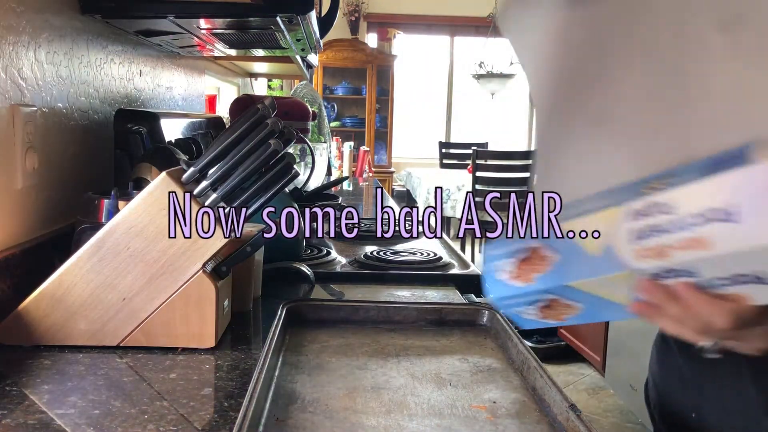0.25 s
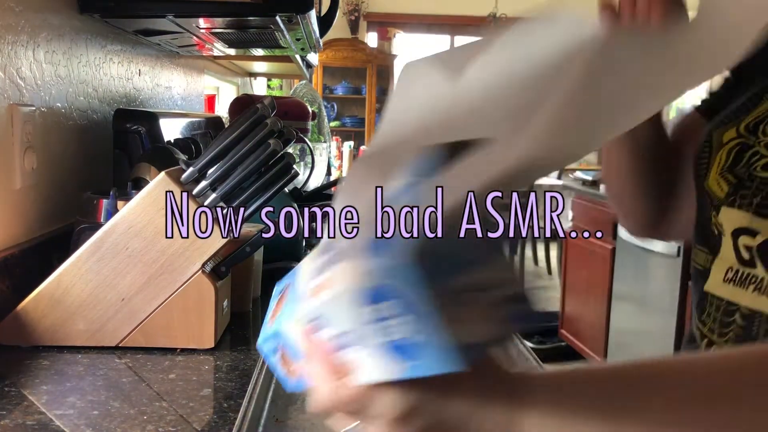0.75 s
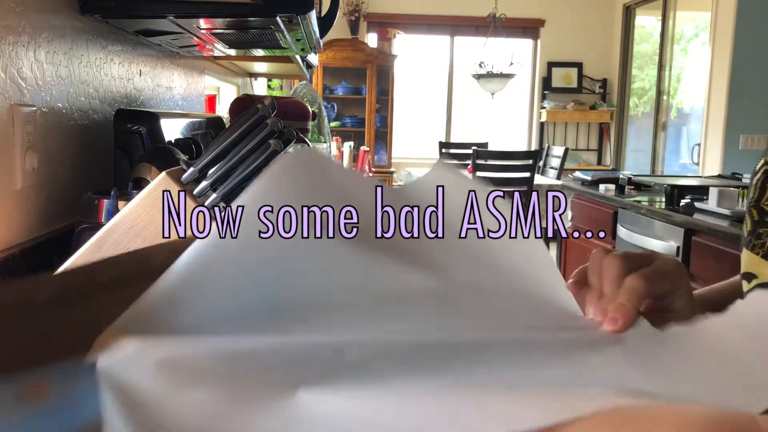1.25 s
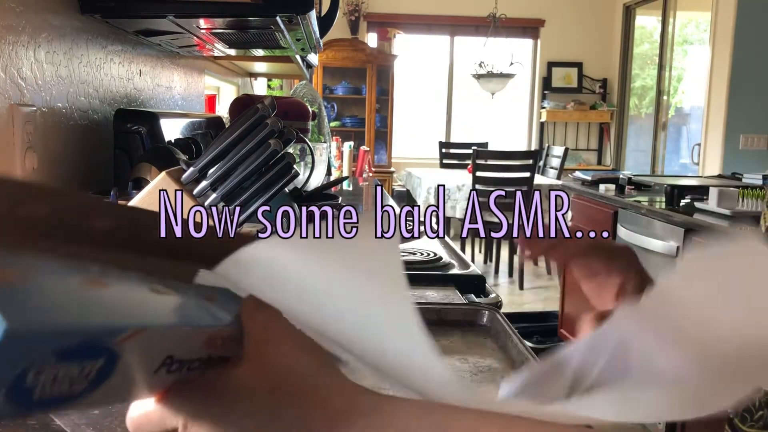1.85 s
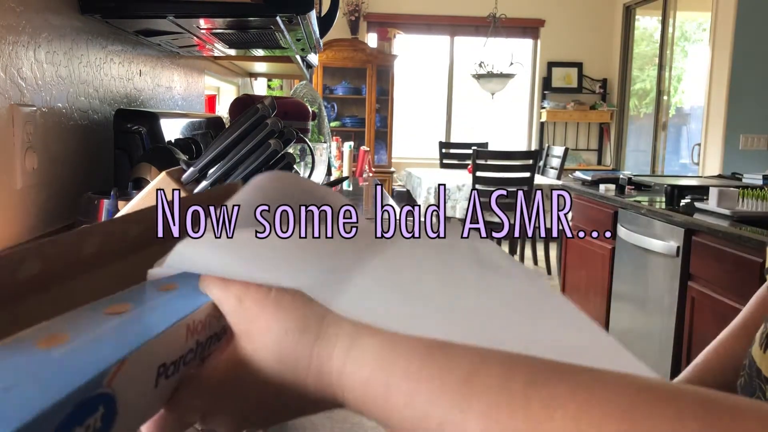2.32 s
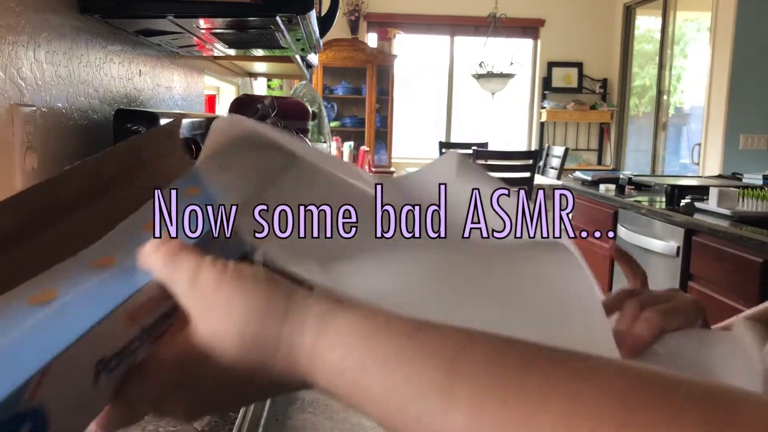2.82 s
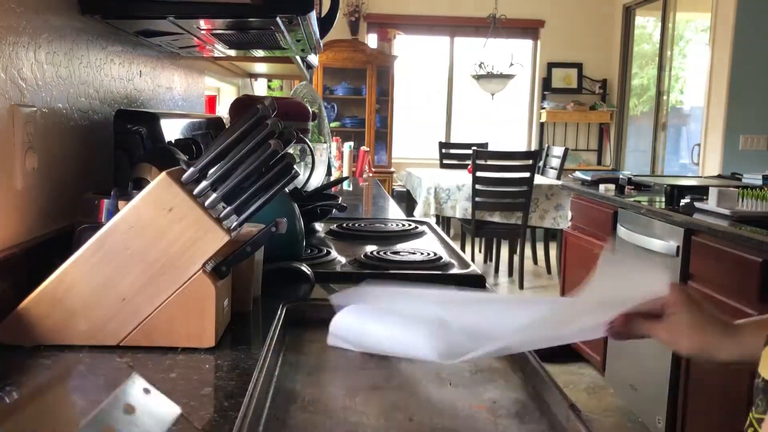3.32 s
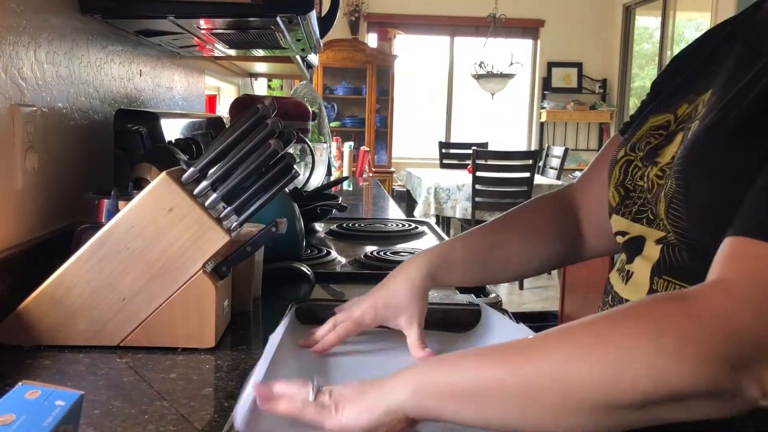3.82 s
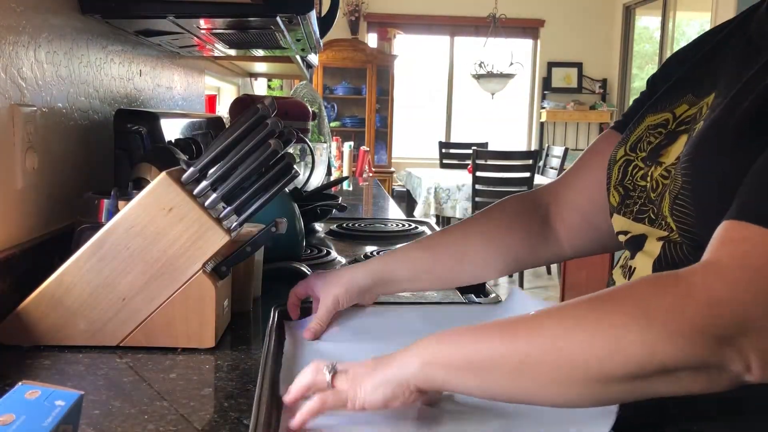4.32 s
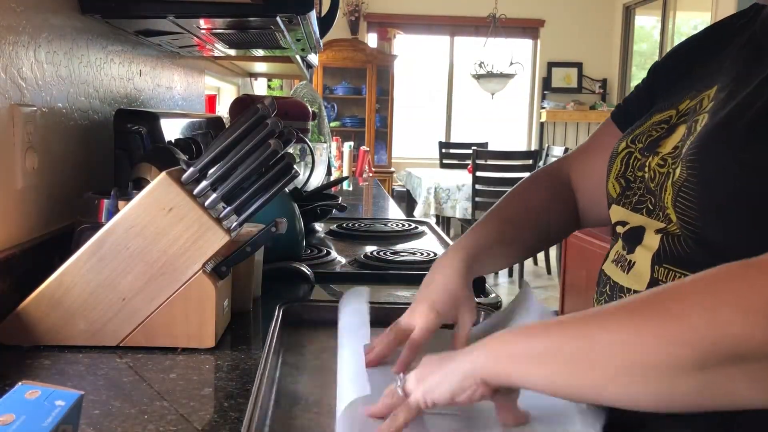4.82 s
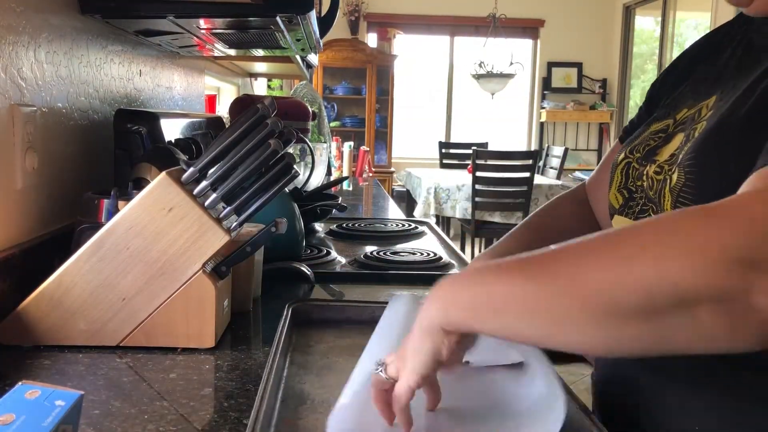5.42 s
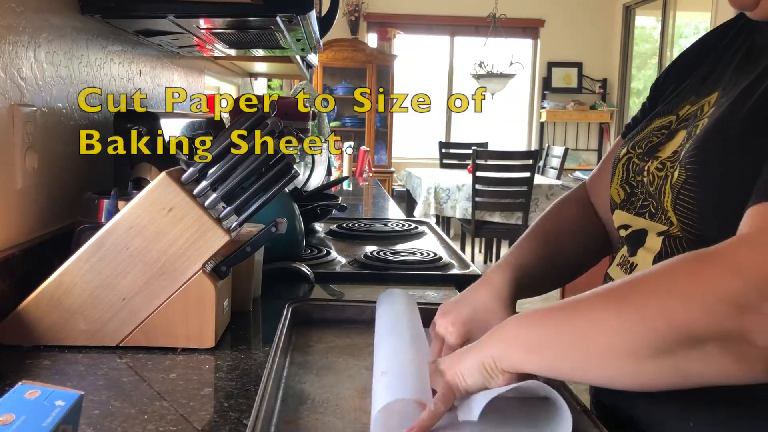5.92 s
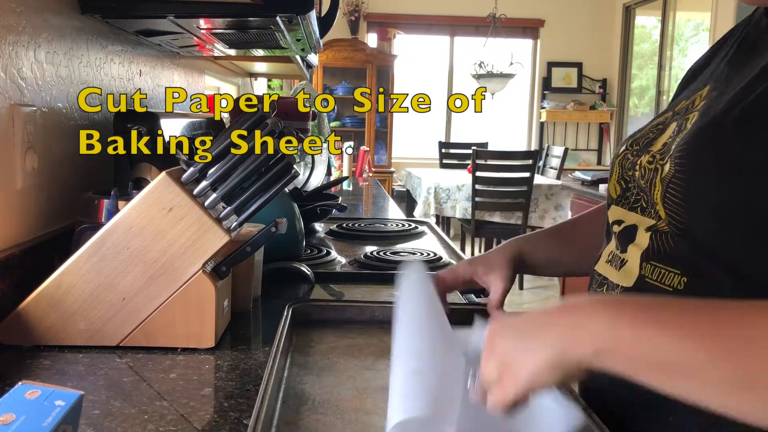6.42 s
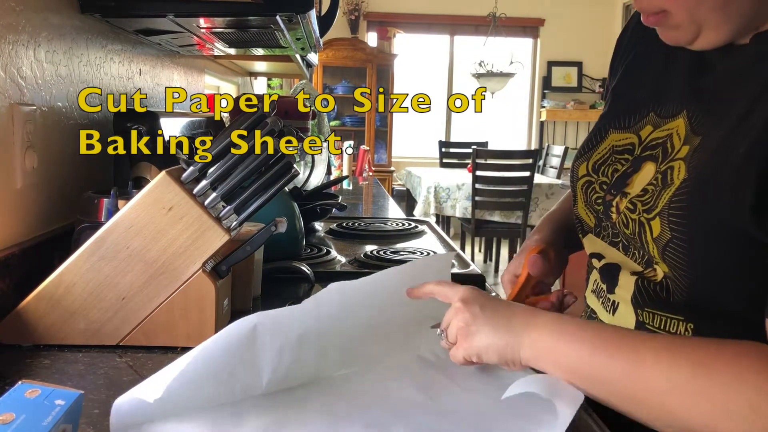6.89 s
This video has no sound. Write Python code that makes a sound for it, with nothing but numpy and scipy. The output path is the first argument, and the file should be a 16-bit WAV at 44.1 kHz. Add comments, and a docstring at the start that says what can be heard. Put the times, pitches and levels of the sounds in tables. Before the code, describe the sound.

A stiff sheet of baking paper is shaken close to the microphone, crackling and snapping loudly, with two short rasping tugs from its carton. A longer tear follows along the cutter, ending in sharp jerks. The box is set down with a clatter of knocks, then hands smooth the much quieter sheet over a metal tray with swishes and tiny pops, in a hard-walled kitchen.

```python
"""Parchment paper rasps from its box, is waved about and torn off along the cutter: stick-slip grains, coloured
by broad spectra and by the resonances of sheet and carton, with creases snapping through. The scene then
changes: knocks of the box are dispersed pulses, and hands smooth the sheet over a metal tray, as a swish of
grains, popping wrinkles and a low noise rub. All is close by, in a kitchen with hard walls, still air (shaped
noise) and a faint appliance hum (wavering sines)."""
import sys
import numpy as np
from scipy import signal
from scipy.fft import rfft, irfft
from scipy.io import wavfile
from scipy.ndimage import uniform_filter1d

SR = 44100
rng = np.random.default_rng(int(sys.argv[2]) if len(sys.argv) > 2 else 0)


def materialize(psi):
    """Save the field psi as 16-bit PCM at rate SR to the path in sys.argv[1].

    A 1-D psi becomes a single channel; in a 2-D psi each row is a channel.
    """
    bounded = np.clip(np.atleast_2d(psi).T, -1, 1)
    quanta = np.round(bounded * 32767).astype(np.int16)
    wavfile.write(sys.argv[1], SR, quanta)


N = 315590

# Spectra set relative density only. Each row: frequency in Hz, density in dB per Hz.
AIR_SPECTRUM = [(25, -60), (60, -33), (110, -10.5), (200, -16), (300, 1.5), (440, 9.5), (620, -1),
                (1050, -0.5), (1400, 6.5), (2200, -1), (3000, -4), (4000, -53), (8000, -11), (16000, -3)]  # still kitchen air
KNOCK_SPECTRUM = [(30, -63), (60, -49), (130, -19), (220, 2), (600, -4), (1700, -1.5), (2200, -7),
                  (2600, 6), (2950, -25), (4000, -1), (8000, 3), (16000, -34)]  # blows on counter and tray
SWISH_SPECTRUM = [(100, -63), (400, -2), (1000, -11), (1400, -4), (2000, 2), (2500, 3.5), (2900, -6.5),
                  (3500, 3), (5600, 4), (8800, 2), (12000, 6), (16000, 3.5)]  # palms over the paper
RUB_SPECTRUM = [(30, -64), (60, -43), (110, -24), (190, -2), (450, 2.5), (650, 0), (850, 1), (1100, -14),
                (2500, -55)]  # pressure of the hands on the tray
SNAP_SPECTRUM = [(50, -18.5), (250, -17), (600, -8.5), (850, -12.5), (1600, -1.5), (3500, 1), (8000, 2),
                 (16000, -3.5)]  # creases snapping through
SHEET_SPECTRUM = [(100, -35), (250, -17), (400, -12.5), (680, -3.5), (850, -12), (1100, -2.5), (1500, 0),
                  (2200, -4), (3500, -2.5), (6000, -6.5), (9000, -11), (12000, -15.5), (16000, -18)]  # rustle of the loose sheet
PUFF_SPECTRUM = [(20, -30), (40, -25), (65, 0), (120, 2), (250, -1.5), (450, 5), (1000, -68), (3000, -60)]  # air fanned by the sheet
RIP_SPECTRUM = [(30, -40), (60, -15.5), (250, -12), (450, -1.5), (720, -16.5), (840, -11), (1000, -4.5),
                (1300, 1), (1600, 2), (2200, -2), (3500, 0.5), (6000, 1), (9000, -1), (11000, -4),
                (16000, -10)]  # breaking fibres

# Appliance tones. Each row: frequency in Hz, level before the fade in dB, rms waver in Hz.
HUM_TONES = [(207, -74.5, 2.5), (1320, -71, 4.97)]
# Fade of the hum. Each row: time in seconds, gain in dB.
HUM_FADE = [(0, -9.5), (6.3, -0.5), (6.8, -12)]
# Decay of the room. Each row: frequency in Hz, t60 in seconds.
ROOM_DECAY = [(200, 0.24), (700, 0.19), (2000, 0.1), (6000, 0.2), (15000, 0.15)]
# Box set down, then fingertips on the tray. Each row: time in seconds, level in dB, knock pitch in Hz.
KNOCKS = [(3.3706, -30.5, 1960), (3.4066, -40, 1720), (3.4519, -46, 600), (3.4607, -38.5, 1147),
          (3.5073, -39.5, 2300), (3.518, -43, 780), (3.527, -40.5, 2600), (3.648, -56, 900),
          (4.669, -55, 400), (4.768, -53, 448), (4.901, -54.5, 350), (4.966, -55, 447), (5.098, -54.5, 330),
          (5.292, -53.5, 516), (6.11, -67, 300), (6.34, -57, 200)]
# Largest wrinkles popping under the fingers. Each row: time in seconds, level in dB, crack length in seconds.
LARGE_POPS = [(3.3115, -37.5, 0.0039), (3.3527, -29.5, 0.0041), (3.5068, -34.5, 0.0018),
              (3.646, -33.5, 0.0036), (4.5488, -46, 0.0031), (4.5587, -42, 0.0028), (4.8744, -39, 0.0067),
              (5.0936, -43, 0.0044), (5.41, -39, 0.0085), (5.574, -37, 0.0012), (5.632, -36.5, 0.0056),
              (5.6948, -37, 0.0007), (5.829, -40, 0.0036), (5.981, -51, 0.0005), (6.0, -38.5, 0.0035),
              (6.05, -34, 0.004), (6.1345, -40, 0.003), (6.179, -33.5, 0.0018), (6.661, -33.5, 0.0078),
              (6.705, -36, 0.0059), (6.763, -39.5, 0.0031), (7.111, -44, 0.00072)]
# Hands sweeping the sheet over the tray. Each row: start in seconds, length in seconds, level in dB,
# treble over body in dB, level of the low rub in dB.
SWEEPS = [(3.273, 0.32, -52.5, 8, -62.5), (3.625, 0.05, -44.5, 3.5, -58.5), (3.69, 0.1, -62, 10, -71),
          (3.804, 0.14, -58.5, 7, -63.5), (3.984, 0.1, -63, 9.5, -76), (4.09, 0.47, -59.5, 9, -70.5),
          (4.367, 0.059, -54.5, 4, -73), (4.494, 0.17, -60, 4, -70), (4.65, 0.12, -61.5, 6.5, -72),
          (4.776, 0.13, -53.5, 5, -62), (4.922, 0.084, -56.5, 3, -65), (5.008, 0.11, -52.5, 4, -66),
          (5.135, 0.084, -47.5, 6.5, -59.5), (5.224, 0.12, -60.5, 0, -66), (5.395, 0.071, -50, 4, -64),
          (5.497, 0.15, -52, 9, -68), (5.68, 0.16, -58.5, 11.5, -72), (5.82, 0.34, -58, 6.5, -69),
          (6.034, 0.15, -47, 5, -58), (6.208, 0.13, -61.5, 12.5, -67.5), (6.337, 0.08, -51, 9.5, -76),
          (6.442, 0.25, -49, 7, -64), (6.716, 0.18, -55, 5.5, -69), (6.87, 0.19, -64, 7, -73),
          (7.082, 0.081, -62.5, 9, -73)]
# Creases of the loose sheet snapping through. Each row: time in seconds, level in dB,
# treble over body in dB, crack length in seconds.
SNAPS = [(0.0337, -27.5, 1, 0.0023), (0.08, -29, -2, 0.005), (0.2341, -30, -6.5, 0.0067),
         (0.485, -42.5, -14, 0.0015), (0.5322, -38, -9, 0.002), (0.544, -39.5, -6, 0.00091),
         (0.617, -26.5, -2, 0.002), (0.6608, -26, -5.5, 0.0055), (0.7124, -35, -8, 0.0037),
         (0.8317, -26, -3, 0.004), (0.8685, -25.5, 4, 0.0041), (1.1116, -19.5, -1.5, 0.0019),
         (1.312, -24.5, 28, 0.00069), (1.3851, -30.5, -3, 0.00057), (1.42, -30.5, -5, 0.0049),
         (1.4399, -25, 5, 0.0005), (1.4502, -21, 24, 0.0022), (1.5718, -26, 0, 0.0018),
         (1.6267, -19, 4, 0.0047), (1.6896, -28, -5.5, 0.012), (1.7666, -42, -4, 0.0013),
         (1.962, -34.5, -2, 0.0065), (2.075, -41, -2, 0.008), (2.318, -41.5, -15, 0.0093),
         (2.3776, -31.5, 1, 0.00097), (2.5494, -34.5, -5, 0.004), (2.577, -24.5, -5, 0.015),
         (3.0458, -22.5, 9, 0.0034), (3.1859, -33, -13, 0.006), (3.199, -21.5, 0, 0.0095)]
# Swings of the loose sheet. Each row: start in seconds, length in seconds, level in dB, treble over body in dB.
SWINGS = [(-0.05, 0.15, -36.5, 5), (0.1, 0.2, -38.5, 3.5), (0.3, 0.09, -42, -7.5), (0.725, 0.16, -39.5, -4),
          (0.8, 0.067, -34.5, 1), (0.89, 0.12, -57, 6.5), (0.985, 0.081, -40, -2.5),
          (1.24, 0.048, -33.5, -2), (1.438, 0.03, -32, 3.5), (1.49, 0.072, -41.5, 0.5),
          (1.565, 0.08, -31, 3.5), (1.7, 0.026, -40.5, -5), (1.772, 0.046, -41.5, -1),
          (1.893, 0.05, -36.5, -2.5), (1.98, 0.082, -41.5, -8.5), (2.085, 0.097, -44.5, -16),
          (2.2, 0.032, -65, -19), (2.36, 0.043, -38, -6), (2.48, 0.1, -49, -1.5),
          (2.565, 0.082, -34.5, -1.5), (3.01, 0.12, -39, -3.5), (3.215, 0.12, -46.5, 4)]
# Two tugs off the roll, the tear and its final jerk, the last corner ripping free.
# Each row: start in seconds, length in seconds, level in dB, treble over body in dB.
RIPS = [(1.11, 0.086, -23, 5.5), (1.2, 0.045, -24.5, 6.5), (2.642, 0.33, -25, 6),
        (2.985, 0.025, -25.5, 4.5), (3.195, 0.017, -22, 2.5)]
# Resonances of the hollow carton. Each row: frequency in Hz, width in Hz, lift in dB.
CARTON_MODES = [(688, 123, 19), (958, 19, 13), (1113, 27, 3.5), (1220, 33, 9.5), (1360, 22, 6.5),
                (1404, 14, -4.5), (3030, 37, 10.5)]

TIME = np.arange(N) / SR
TAPS = 2048
HZ = np.fft.rfftfreq(TAPS, 1 / SR)
SPLIT_HZ = 4500  # border of body and treble
EDGE_HZ = 16000  # band limit of the recorder
CRACK_S = 0.005  # cracks and blows have rms 1 over this time
SECOND_SCENE_S = 3.285  # the first scene, waving and tearing, gives way here to the second, smoothing

# Strokes: rise, drop of the ends below the middle, fall after the end, extra treble exponent when slow
SWING_RISE_S, SWING_ARCH_DB, SWING_FALL_DB_PER_S, SWING_DULLING = 0.017, 3, 217, 0.3
RIP_RISE_S, RIP_ARCH_DB, RIP_FALL_DB_PER_S, RIP_DULLING = 0.014, 3.5, 355, 0.7
SWEEP_RISE_S, SWEEP_ARCH_DB, SWEEP_FALL_DB_PER_S, SWEEP_DULLING = 0.02, 4, 264, 0.11
HELD_DB, HELD_CRISP_DB = -51, -13.5  # faint rustle between the swings
LYING_DB, LYING_CRISP_DB = -77, -2  # faint rustle under resting hands
FAN_DB, FAN_SHARE = -44, 0.35  # the push of air gains FAN_SHARE dB for each dB of rustle
CRINKLE_DB = -9  # tiny separate creases, relative to the grains of the rustle
POPS_PER_S, POP_S = 32, 0.001  # the many smaller wrinkles
POP_DB, POP_SPREAD_DB = 5.5, 3.5  # their level relative to the swish, and its spread
POP_CEILING_DB = -58  # swish level above which a harder sweep makes them no louder
SOFTNESS_DB_PER_OCT = 11  # a blow loses treble from an octave above its pitch
DRUM_START_S, DRUM_LENGTH_S, DRUM_DB = 2.76, 0.13, -29.5  # pulled taut partway through the tear
DRUM_HZ, DRUM_WIDTH_HZ = 1340, 160  # 6 dB down at this distance from the centre


def amp(db):
    """Level law: decibels to amplitude gain."""
    return 10 ** (np.asarray(db) / 20)


def unit(x):
    """Normalisation to rms 1."""
    return x / np.sqrt(np.mean(x ** 2) + 1e-20)


def read(points, hz=HZ):
    """Interpolation of a spectrum on a logarithmic frequency axis."""
    f, value = np.transpose(points)
    return np.interp(np.log(hz + 1), np.log(f), value)


def add(mix, s, sound):
    """Superposition of a sound from time s onwards."""
    part = mix[max(round(s * SR), 0):][:len(sound)]
    part += sound[:len(part)]


def colour(x, db):
    """Minimum-phase filtering at unit energy: the response rings after a click, never before."""
    log_gain = np.log(amp(np.r_[db, db[-2:0:-1]]))
    ring = np.fft.ifft(np.exp(np.conj(signal.hilbert(log_gain)))).real
    return signal.oaconvolve(x, ring / np.linalg.norm(ring))[:len(x)]


def wander(rate, size=N):
    """Low-pass noise: smooth chance of rms 1, its Gaussian band scaled by rate in Hz."""
    f = np.fft.rfftfreq(size, 1 / SR)
    spectrum = rfft(rng.standard_normal(size)) * np.exp(-(f / rate) ** 2)
    return unit(irfft(spectrum, size))


def grains(per_s, spread_db, hiss_db, clump_db, clump_rate):
    """Stick and slip of fibres: clicks of uneven size over a fine hiss, coming in clumps."""
    size = amp(spread_db * np.minimum(rng.exponential(1, N), 3))
    clicks = size * rng.choice([-1, 1], N) * (rng.random(N) < per_s / SR)
    mixed = unit(clicks) + amp(hiss_db) * rng.standard_normal(N)
    return unit(mixed * amp(clump_db * wander(clump_rate)))


def scatter(x, t60, wet_db):
    """Diffuse scattering: a click's energy spreads through sheet and counter into a decaying noise."""
    keep = np.exp(-2 * np.log(1000) / (t60 * SR))
    power = signal.lfilter([1 - keep], [1, -keep], x ** 2)
    return x + amp(wet_db) * np.sqrt(power) * rng.standard_normal(len(x))


def crisp(x, crisp_db, lowest_hz):
    """Spectral tilt: the treble is moved towards crisp_db over the body band, whose rms is held at 1."""
    hz, t, z = signal.stft(x, SR, nperseg=256)
    power = np.mean(abs(z) ** 2, axis=1, keepdims=True)
    body, treble = (hz > lowest_hz) & (hz < SPLIT_HZ), hz >= SPLIT_HZ
    present_db = 10 * np.log10(power[treble].sum() / power[body].sum())
    excess_db = np.interp(t, TIME, crisp_db) - present_db
    tilt = amp(0.38 * np.log2(1 + (hz[:, None] / 3500) ** 2) * excess_db)
    tilt /= np.sqrt((power * tilt ** 2)[body].sum(0) / power.sum())
    return signal.istft(z * tilt, SR, nperseg=256)[1][:N] / np.std(x)


def flex(x, patchy_db, width_hz, hold):
    """Shifting resonance of a bending sheet: random patches width_hz wide that last hold seconds."""
    hz, t, z = signal.stft(x, SR, nperseg=512, noverlap=384)
    field = rng.standard_normal(z.shape)
    for axis, span in enumerate((width_hz / hz[1], hold / t[1])):
        field = uniform_filter1d(field, max(round(span), 1), axis)
    patched = z * amp(patchy_db * unit(field))
    return unit(signal.istft(patched, SR, nperseg=512, noverlap=384)[1][:N])


def strokes(rows, rise_s, arch_db, fall_db_per_s, dulling, rest_db=-120, rest_crisp_db=0):
    """Friction follows speed: each stroke rises, arches, dies away, and is duller when slow (dB curves)."""
    body, treble = amp(rest_db) ** 2, amp(rest_db + rest_crisp_db) ** 2
    clock = TIME[::32]
    for start, length, db, crisp_db in rows:
        t = clock - start
        arch = (2 * np.clip(t / length, 0, 1) - 1) ** 2
        fall = fall_db_per_s * np.maximum(t - length, 0)
        speed = np.clip(t / rise_s, 0, 1) * amp(-arch_db * arch - fall)
        body = body + (amp(db) * speed) ** 2
        treble = treble + (amp(db + crisp_db) * speed ** (1 + abs(dulling))) ** 2
    return [np.interp(TIME, clock, 10 * np.log10(power)) for power in (body, treble / body)]


def first_scene():
    """Change of scene: 1 during the first scene, decaying to 0 once the second scene begins."""
    return np.exp(-np.maximum(TIME - SECOND_SCENE_S, 0) / 0.0031)


def crack(length):
    """Buckling: one sharp break, then a volley of tiny slips; rms 1 over CRACK_S."""
    t = np.arange(TAPS * 4) / SR
    envelope = np.exp(-t / max(length, 1 / SR)) + 0.26 * np.exp(-t / 0.00015)
    burst = rng.standard_normal(len(t)) * envelope
    return burst / np.linalg.norm(burst) * np.sqrt(CRACK_S * SR)


def background():
    """Steady sources: noise of still air, and wavering tones of an appliance that sink at the end."""
    hum = np.zeros(N)
    for hz, db, waver in HUM_TONES:
        cycles = np.cumsum(hz + waver * wander(15)) / SR
        hum += amp(db) * np.sqrt(2) * np.sin(2 * np.pi * cycles)
    hum *= amp(np.interp(TIME, *np.transpose(HUM_FADE)) + 0.67 * wander(7.4))
    return hum + amp(-62.5) * colour(rng.standard_normal(N), read(AIR_SPECTRUM))


def kitchen(x):
    """Reverberation: the diffuse tail of a hard-walled room decays at a rate set by frequency."""
    hz, t, z = signal.stft(rng.standard_normal(SR // 2), SR, nperseg=256)
    decay = amp(-60 * t / read(ROOM_DECAY, hz)[:, None])
    tail = signal.istft(z * decay, SR, nperseg=256)[1]
    tail = tail * np.minimum(np.arange(len(tail)) / SR / 0.01, 1)  # builds up over 10 ms
    return signal.oaconvolve(x, tail / np.linalg.norm(tail))[:N]


def knocks():
    """Dispersion: bending waves are slower at low pitch, so each knock on counter or tray droops."""
    out = np.zeros(N)
    f = np.fft.rfftfreq(TAPS * 2, 1 / SR)
    lag = 0.0063 * np.maximum(np.sqrt(1000 / (f + 100)) - 0.45, 0.05)  # group delay in seconds
    phase = -2 * np.pi * np.cumsum(lag) * f[1]
    blow = irfft(np.exp(1j * phase)) * np.sqrt(CRACK_S * SR)
    for s, db, hz in KNOCKS:
        octaves = np.log2((HZ + 1) / hz)
        softness = SOFTNESS_DB_PER_OCT * np.maximum(octaves - 1, 0)
        focus = -2.5 * np.minimum(octaves ** 2, 2) - softness
        spread = scatter(blow, t60=0.048, wet_db=0.0)
        add(out, s, amp(db) * colour(spread, read(KNOCK_SPECTRUM) + focus))
    return out


def hands():
    """Friction of the sweeping hands: level and crispness of the swish, and level of the rub, in dB."""
    shape = SWEEP_RISE_S, SWEEP_ARCH_DB, SWEEP_FALL_DB_PER_S, SWEEP_DULLING
    db, crisp_db = strokes([row[:-1] for row in SWEEPS], *shape, LYING_DB, LYING_CRISP_DB)
    rub_rows = [(start, length, rub, 0) for start, length, _, _, rub in SWEEPS]
    rub_db, _ = strokes(rub_rows, *shape)
    return db, crisp_db, rub_db


def wrinkles():
    """Buckling under pressure: wrinkles pop as they are pressed flat, a few large and many small."""
    pops = np.zeros(N)
    for s, db, length in LARGE_POPS:
        add(pops, s, amp(db) * crack(length))
    swish_db = np.minimum(hands()[0], POP_CEILING_DB)
    size = amp(swish_db + POP_DB + POP_SPREAD_DB * rng.standard_normal(N))
    small = size * (rng.random(N) < POPS_PER_S / SR)
    pops += signal.oaconvolve(small * (1 - first_scene()), crack(POP_S))[:N]
    pops = scatter(pops, t60=0.025, wet_db=-2)
    flexed = np.std(pops) * flex(pops, patchy_db=3, width_hz=780, hold=0.047)
    return colour(flexed, read(SWISH_SPECTRUM))


def smoothing():
    """Sliding friction of palms on paper: a gritty swish, dry crackle on top and a low rub from the tray."""
    db, crisp_db, rub_db = hands()
    drive = grains(per_s=2000, spread_db=2, hiss_db=6.0, clump_db=3.0, clump_rate=78)
    drive = scatter(drive, t60=0.048, wet_db=-2)
    crackle = grains(per_s=260, spread_db=3, hiss_db=-25, clump_db=3, clump_rate=60)
    drive = flex(drive, patchy_db=4.0, width_hz=500, hold=0.023) + amp(-7.5) * crackle
    swish = amp(db) * crisp(colour(drive, read(SWISH_SPECTRUM)), crisp_db, lowest_hz=1500)
    rub = amp(rub_db) * colour(rng.standard_normal(N), read(RUB_SPECTRUM))
    return (1 - first_scene()) * (swish + rub)


def snaps():
    """Snap-through: creases flip over, tight ones bright and wide ones dull; the sheet shivers on, duller."""
    out = np.zeros(N)
    slope = np.tanh(np.log((HZ + 1) / 3500))
    for s, db, crisp_db, length in SNAPS:
        click = crack(length)
        shiver = scatter(click, t60=0.05, wet_db=-5) - click
        bright = read(SNAP_SPECTRUM) + crisp_db * slope
        duller = read(SNAP_SPECTRUM) + (0.24 * crisp_db - 7) * slope
        add(out, s, amp(db) * (colour(click, bright) + colour(shiver, duller)))
    return out


def waving():
    """Stick-slip and fanning: the stiff sheet slides over itself and the box, and pushes the air."""
    shape = SWING_RISE_S, SWING_ARCH_DB, SWING_FALL_DB_PER_S, SWING_DULLING
    db, crisp_db = strokes(SWINGS, *shape, HELD_DB, HELD_CRISP_DB)
    drive = grains(per_s=2500, spread_db=0.5, hiss_db=2.5, clump_db=2.5, clump_rate=230)
    drive = scatter(drive, t60=0.037, wet_db=4.5)
    crinkle = grains(per_s=160, spread_db=2.5, hiss_db=-30, clump_db=2, clump_rate=40)
    crinkle = unit(scatter(crinkle, t60=0.012, wet_db=0))
    drive = flex(drive, patchy_db=1.5, width_hz=350, hold=0.11) + amp(CRINKLE_DB) * crinkle
    rustle = amp(db) * crisp(colour(drive, read(SHEET_SPECTRUM)), crisp_db, lowest_hz=300)
    puff = amp(FAN_DB + FAN_SHARE * db) * colour(rng.standard_normal(N), read(PUFF_SPECTRUM))
    return first_scene() * (rustle + puff)


def drumming():
    """Membrane resonance: the breaking fibres ring one broad resonance of the taut sheet."""
    row = (DRUM_START_S, DRUM_LENGTH_S, DRUM_DB, 0)
    db, _ = strokes([row], rise_s=0.035, arch_db=4, fall_db_per_s=118, dulling=0)
    drive = grains(per_s=3000, spread_db=2.2, hiss_db=-5, clump_db=1.2, clump_rate=100)
    resonance = -20 * np.log10(1 + ((HZ - DRUM_HZ) / DRUM_WIDTH_HZ) ** 2)
    return amp(db) * colour(drive, resonance)


def ripping():
    """Fracture: fibres break in a dense, even roar at the cutter and excite the modes of the hollow carton."""
    db, crisp_db = strokes(RIPS, RIP_RISE_S, RIP_ARCH_DB, RIP_FALL_DB_PER_S, RIP_DULLING)
    hollow = sum(lift / (1 + (2 * (HZ - hz) / width) ** 2) for hz, width, lift in CARTON_MODES)
    drive = grains(per_s=6000, spread_db=2.2, hiss_db=-5, clump_db=1.2, clump_rate=180)
    drive = scatter(drive, t60=0.0073, wet_db=-5.5)
    drive = flex(drive, patchy_db=3.0, width_hz=200, hold=0.035)
    return amp(db) * crisp(colour(drive, read(RIP_SPECTRUM) + hollow), crisp_db, lowest_hz=300)


def scene():
    """Direct and diffuse sound: paper and knocks, their room tail and the background are summed."""
    held = waving() + ripping() + drumming() + snaps()
    lying = smoothing() + wrinkles() + knocks()
    room = kitchen(amp(-14) * held + amp(-13) * lying)
    return (held + lying + room + background())[None]


def record(dry):
    """Band limitation: a linear-phase low-pass at the recorder's upper edge."""
    low_pass = signal.firwin(401, EDGE_HZ, window=("kaiser", 8), fs=SR)
    return signal.oaconvolve(dry, low_pass[None], "same")


dry = scene()
out = record(dry)
materialize(out)
```